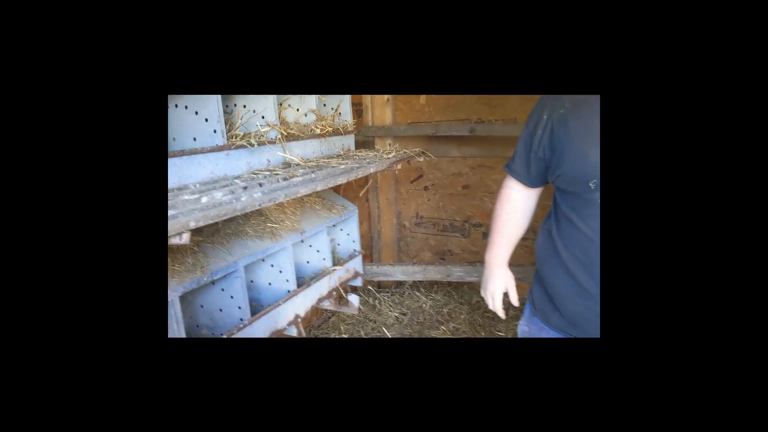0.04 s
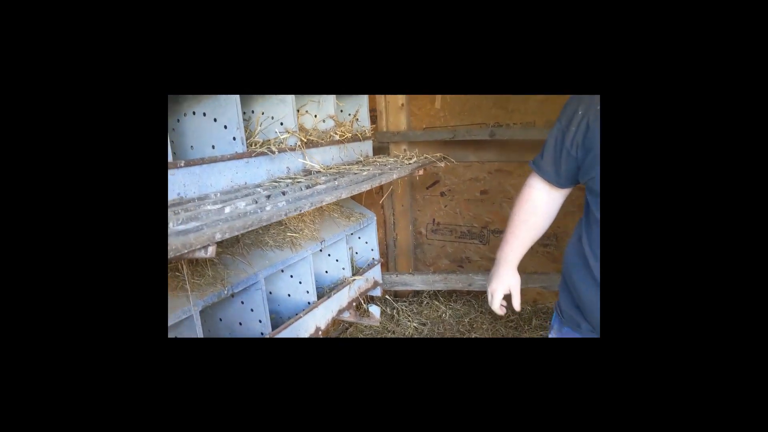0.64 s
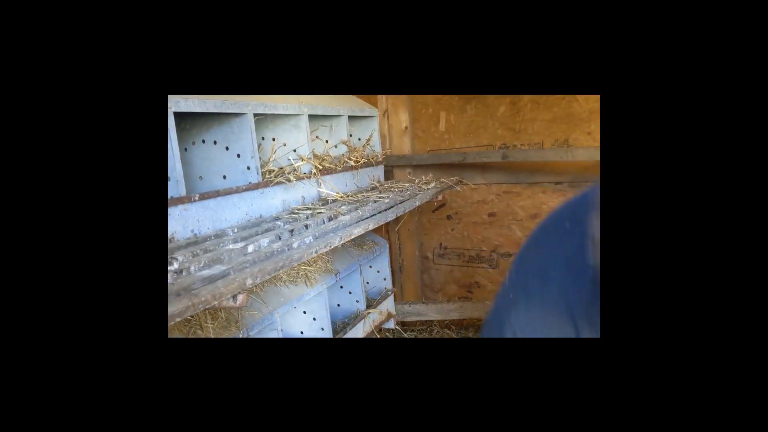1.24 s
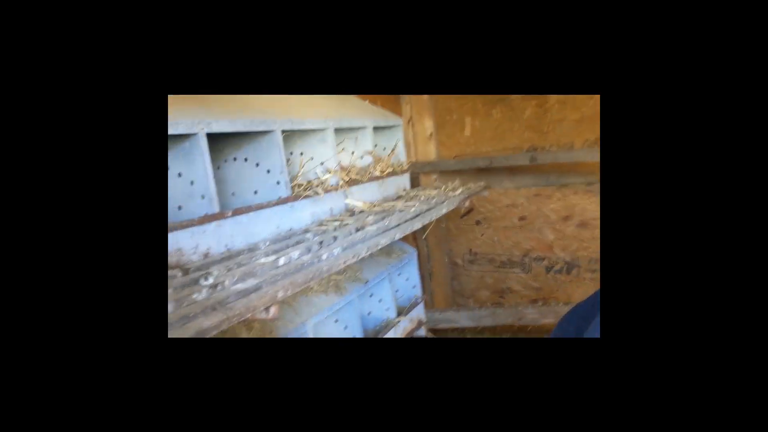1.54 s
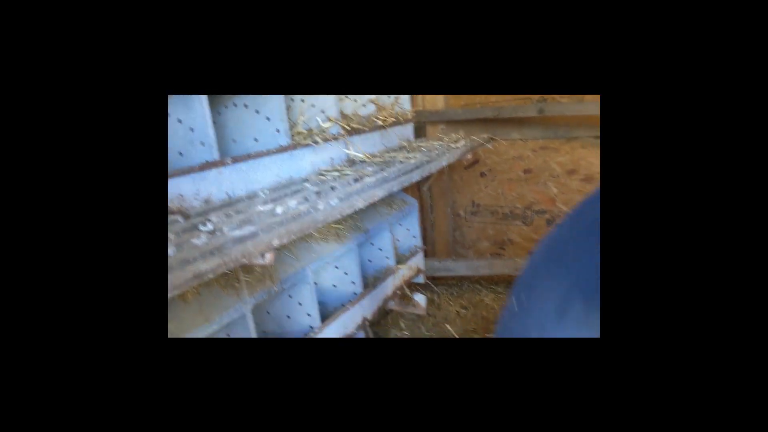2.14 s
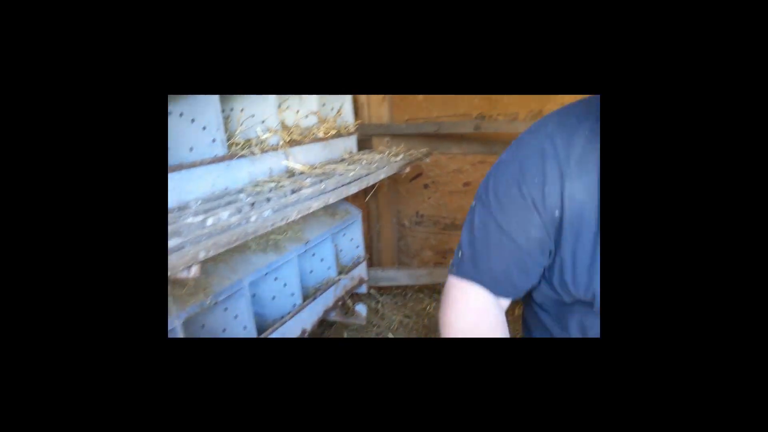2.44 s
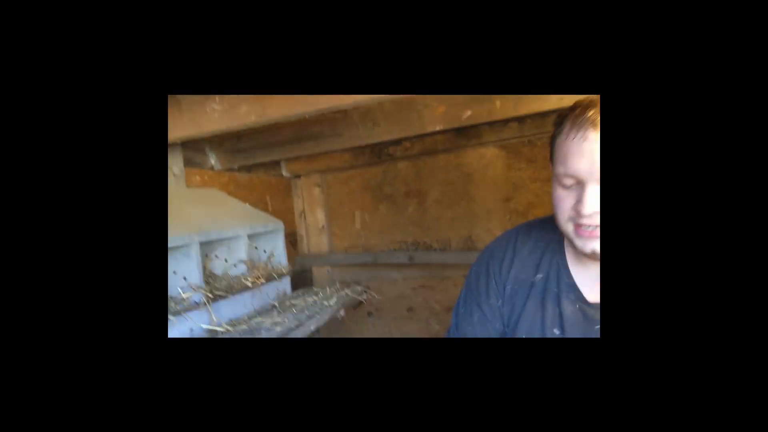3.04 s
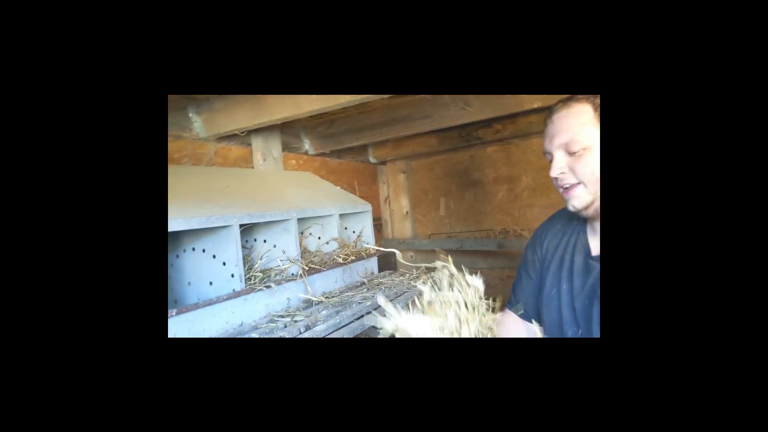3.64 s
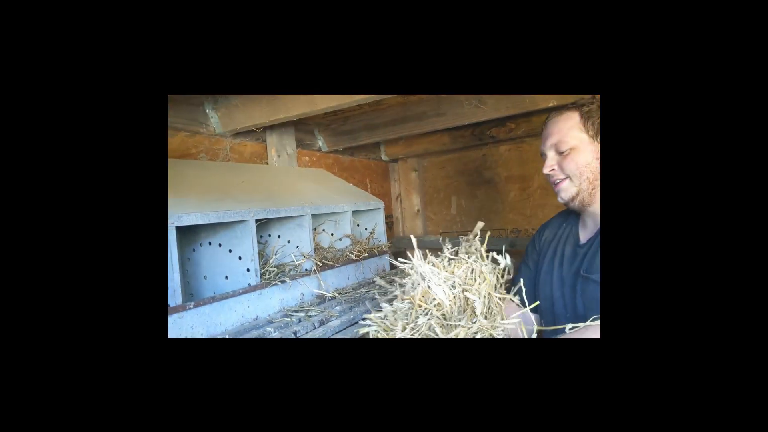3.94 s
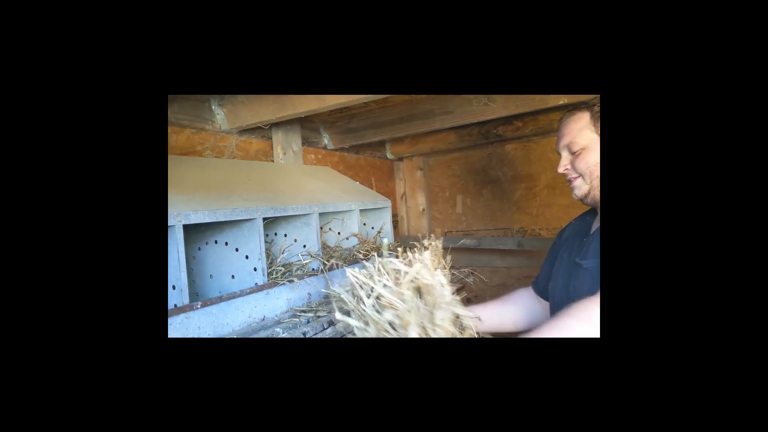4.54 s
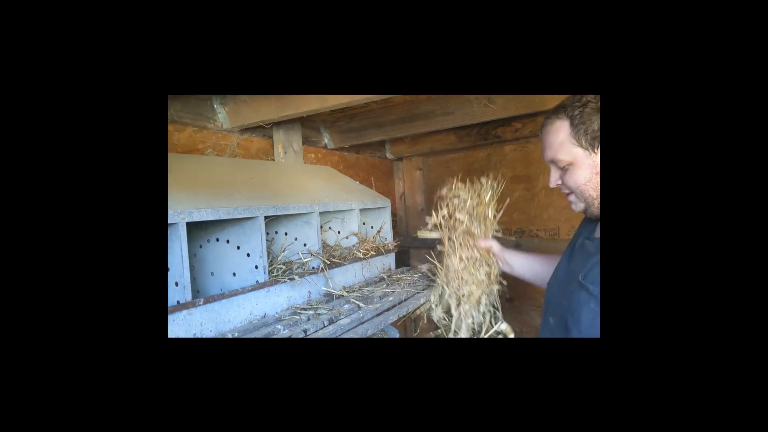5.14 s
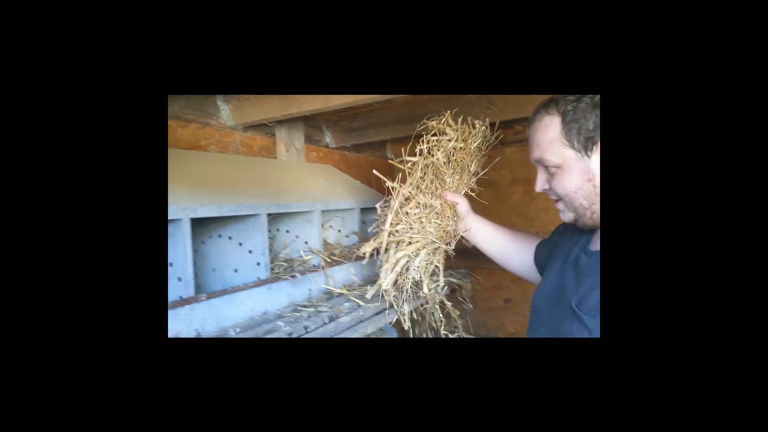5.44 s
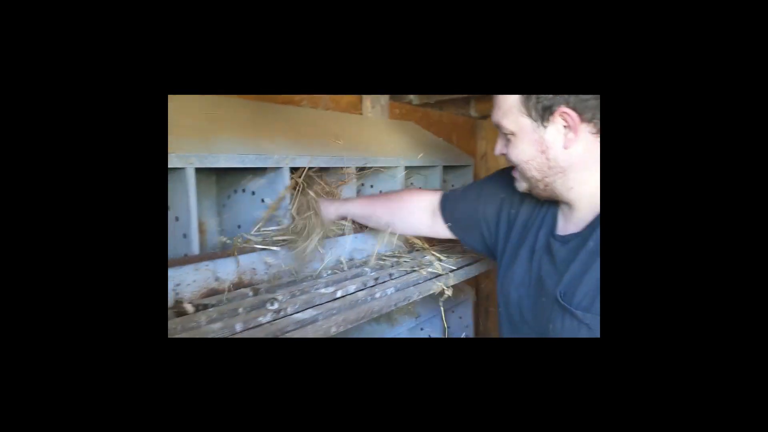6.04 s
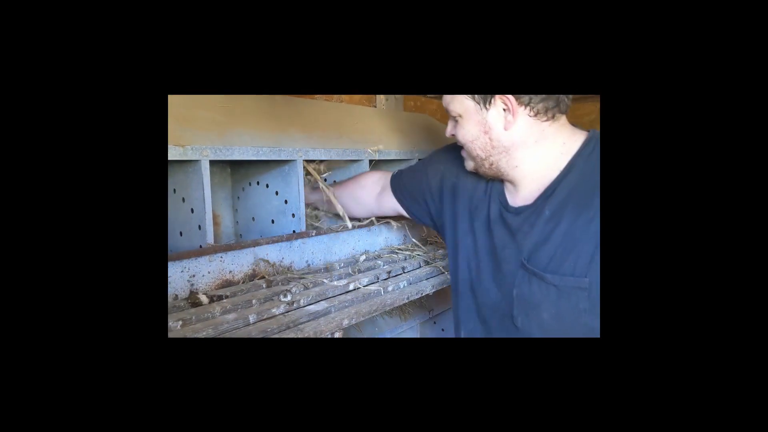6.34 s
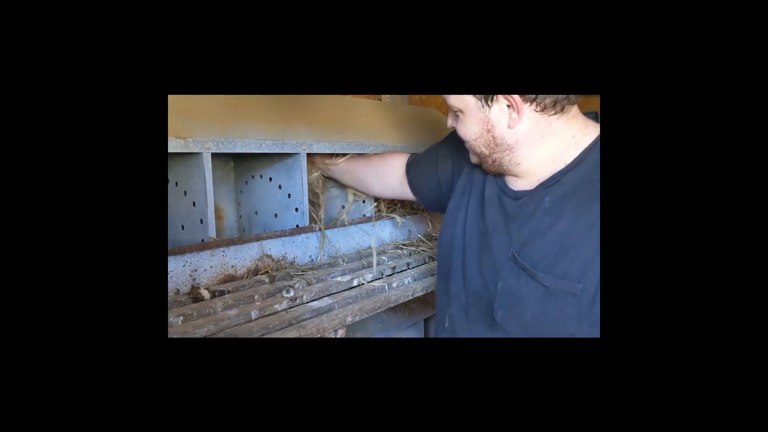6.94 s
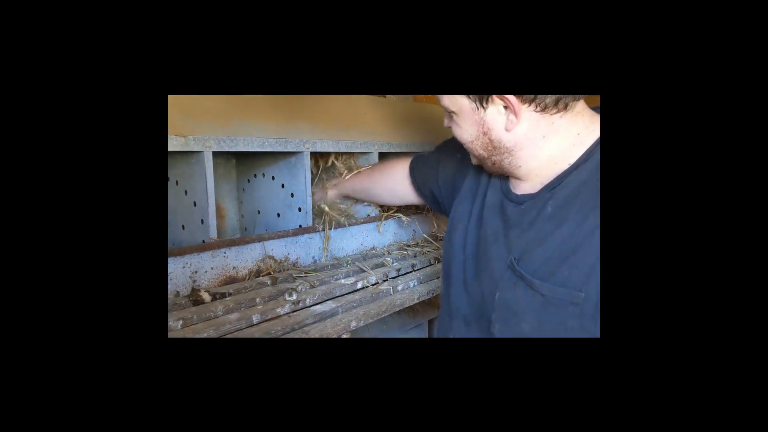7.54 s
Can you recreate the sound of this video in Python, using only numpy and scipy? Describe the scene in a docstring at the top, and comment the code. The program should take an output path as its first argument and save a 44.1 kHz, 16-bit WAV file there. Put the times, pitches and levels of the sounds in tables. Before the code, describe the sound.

For the first second and a half, dry hay rustles lightly close to the microphone in a small wooden chicken house, over quiet outdoor air. A few thin, squeaky calls, likely birds, come from farther off, with small knocks and a soft footfall at about 1.2 seconds. From 1.7 seconds the hay is pulled from a bale in crisp, crackling, swishing swells, with a brief rasp near 2.5. A bump and a board knock come at 3.4. The hay is shaken loose in repeated strokes, strongest around 4.6, followed by a few light wooden clacks just after 5 and a short easing. At about 6.1 seconds the bundle lands in a sheet-metal nest box with a soft thump and sharp stalk snaps, the loudest moment. Quick, uneven shoves follow until nearly 8 seconds, crackling and scraping against the faintly ringing metal walls.

```python
"""Inside a small wooden chicken house, close to the microphone, someone pulls dry hay from a bale,
shakes it loose and stuffs it into a sheet-metal nest box. Thousands of stalks snap and slide over each
other; in the box they scrape the walls and make them ring. Before that come a few thin squeaky calls
from farther off, likely of birds, and now and then a footfall or a knock, over quiet outdoor air."""
import sys
import numpy as np
from scipy import signal
from scipy.fft import rfft, irfft
from scipy.io import wavfile

SR = 44100
rng = np.random.default_rng(int(sys.argv[2]) if len(sys.argv) > 2 else 0)


def transcribe(u):
    """Save the signal u as a 16-bit wav file named by the first command-line argument.

    u: samples, shape (n,) or (channels, n), limited to [-1, 1]; the rate is SR.
    q: integer samples, one column per channel.
    """
    v = np.clip(np.atleast_2d(u).T, -1, 1)
    q = np.round(v * 32767).astype(np.int16)
    wavfile.write(sys.argv[1], SR, q)


N = 343980
TIME = np.arange(N) / SR
FREQS = np.maximum(np.arange(N // 2 + 1) * SR / N, 1)

# the hand in the hay, from light touches through the grab and the long pull to the shakes and the lift:
# peak_s, rise_s, fall_s, crackle_db, swish_over_crackle_db, extra_treble_db
HAND_STROKES = [(.135, 0.038, .03, -50.5, -18, -6), (.38, 0.058, 0.14, -56.5, -5.5, 5.5),
                (.52, 0.058, 0.16, -53.5, 2.5, 5), (.77, 0.17, 0.19, -57.5, 2.5, 6.5),
                (1.01, 0.073, 0.087, -54, 0, 6), (1.27, 0.15, 0.31, -61.5, 4, 3),
                (1.671, 0.014, 0.19, -37, -9, -0.5), (2.17, 0.36, 0.36, -42.5, -10.5, 0),
                (2.6, 0.35, 0.35, -39.5, -8, 2.5), (2.93, 0.039, 0.053, -38, -13, -4),
                (3.275, 0.3, 0.11, -34, -9.5, 4.5), (3.42, 0.092, 0.19, -36, -5.5, 3),
                (3.6, 0.19, 0.29, -40, -7, 0), (3.81, 0.23, 0.13, -38, -7.5, 5.5),
                (3.99, 0.093, 0.068, -36, -8, 3.5), (4.15, 0.15, 0.16, -36.5, -10, 3),
                (4.38, 0.12, 0.14, -37.5, -8.5, 3), (4.561, 0.1, 0.16, -30.5, -9, 3.5),
                (5.238, 0.53, 0.26, -38, -7.5, 3), (5.62, 0.2, 0.25, -45, -7, 2.5),
                (5.97, 0.14, 0.19, -39, -8, 4.5), (6.085, 0.047, 0.081, -30.5, -9.5, -1)]
# spectrum of hay up close: frequency_hz, relative_db
HAY_SPECTRUM = [(59, -46), (110, -12.5), (200, -15), (400, -12), (1400, -5), (2270, -1.93), (5400, -0.74),
                (7400, -7.5), (9500, -2), (11400, 2), (15000, -4), (16000, -14)]
# sparkle at the very top of the crackle: time_s, gain_db
SPARKLE_CURVE = [(1.5, -1), (2.7, 9), (3.25, 4), (3.7, -3), (7.8, -5)]
# single stalks breaking: start_s, level_db
STALK_SNAPS = [(3.2075, -27), (3.947, -31), (6.135, -19), (6.141, -17), (6.329, -24)]
# a tuft dragged free of the bale, then a brief hollow clack: peak_s, rise_s, fall_s, level_db
HOLLOW_RASPS = [(2.52, .07, .11, -43.5), (4.983, .015, .02, -42.5)]
# resonances of the hollow rasp and the clack: pitch_hz, width_hz, relative_db
HOLLOW_RESONANCES = [(530, 52, 0.5), (873, 100, -3), (1400, 87, -1), (2310, 220, -1), (2760, 200, -0.5)]
# shoves into the nest box: peak_s, half_length_s, extra_crackle_db, extra_scrape_db
BOX_SHOVES = [(6.136, 0.031, 9.5, 6.5), (6.212, 0.046, 1.5, 5), (6.306, 0.013, -1, 8.5),
              (6.342, 0.025, 6, 5.5), (6.448, 0.075, 4, 4.5), (6.543, 0.028, 5.5, 7.5),
              (6.683, 0.048, 2.5, 3.5), (6.761, 0.039, 3.5, 5.5), (6.848, 0.021, 3.5, 1),
              (6.928, 0.082, 4, 6), (7.074, .03, 4, 3.5), (7.107, 0.021, 1, 9.5), (7.175, 0.048, 5.5, 8),
              (7.331, 0.049, 4, 6.5), (7.4, 0.026, 5.5, 8.5), (7.515, 0.053, 4, 3),
              (7.614, 0.031, 6.5, 5.5), (7.73, 0.033, 1, 4)]
# spectrum of stalks scraping sheet metal: frequency_hz, relative_db
SCRAPE_SPECTRUM = [(59, -41), (100, -17), (166, -6), (429, -2), (466, -4.5), (786, -0.5), (5000, 5.5),
                   (6500, -40)]
# modes of the nest box walls: pitch_hz, relative_db, t60_s
WALL_MODES = [(168, -.5, .3), (296, 2, .25), (366, -.5, .22), (429, -1, .25), (790, 2, .1), (965, 3.5, .1),
              (1458, 2, .1), (1970, -3, .06), (2180, -2, .08), (2960, -2, .07)]
# spectrum of those walls flexing: frequency_hz, relative_db
FLEX_SPECTRUM = [(28, -6.5), (48, -20), (70, -10), (110, -22.5), (220, -55)]
# knocks on the boards: start_s, clatter_db, ring_db, brightness_hz, clatter_t60_s
BOARD_KNOCKS = [(.113, -54.5, -62, 900, .13), (.26, -38.5, -55, 1800, .018), (.489, -50, -56, 600, .2),
                (1.244, -47, -64, 2100, .14), (3.403, -36, -46, 1300, .07), (5.048, -35, -46, 3000, .1),
                (5.063, -43, -38, 3800, .14), (5.173, -37.5, -44, 3500, .22), (5.64, -48, -58, 1200, .25)]
# modes of the boards: pitch_hz, relative_db
BOARD_MODES = [(255, 0), (735, -2), (1460, -10), (2480, -2), (2820, 4)]
# soft footfalls, bumps and the bundle landing in the box: start_s, level_db, pitch_hz, t60_s
SOFT_THUMPS = [(1.187, -30, 285, .072), (1.189, -38, 400, .035), (1.2, -53, 276, .7), (3.40, -39, 191, .14),
               (3.434, -38, 265, .089), (3.834, -44, 70.9, .2), (6.09, -36, 434, .7)]
# calls farther off: start_s, length_s, start_hz, end_hz, tone_db,
# second_harmonic_over_tone_db, third_harmonic_over_tone_db, rasp_db
SQUEAKY_CALLS = [(.459, .054, 1500, 1475, -43.5, -6, -5.5, -47.5),
                 (.515, .1, 1170, 1120, -52, -12, -25, -56), (.688, .036, 1590, 1650, -46.5, -20, -35, -61),
                 (.7, .11, 1140, 1175, -51, -2, -12, -61), (.988, .065, 1480, 1534, -55, -4, -9, -47),
                 (1.56, .063, 1103, 1114, -57, -14, -25, -72)]
# resonances of the rasp in the calls: pitch_hz, width_hz, relative_db
CALL_RESONANCES = [(2570, 220, 0), (3070, 240, 0), (4350, 150, -2)]
# spectrum of the outdoor air: frequency_hz, relative_db
AIR_SPECTRUM = [(12, -36), (25, 4), (70, -8), (320, -11.5), (1300, -15), (3000, -17), (7500, -27),
                (11800, -23)]
# a faint hum that comes and goes: start_s, length_s, pitch_hz, level_db
LOW_HUMS = [(0.998, 0.45, 148, -60), (1.391, 0.044, 336, -52), (3.952, .23, 140, -58)]
# faint narrow whirs: pitch_hz, width_hz, relative_db
WHIR_RESONANCES = [(67, 14, 13.6), (1760, 110, 3.6), (4430, 89, 2)]
# balance of the two microphone ports: frequency_hz, left_over_right_db
PORT_BALANCE = [(750, 2), (1400, -3.5), (2300, -4.5), (3100, -1.5), (4200, 1.5), (6000, 9), (7500, 0),
                (9000, -3), (11500, -12.5), (15000, -14.5)]
# how alike the sound is at the two ports: frequency_hz, correlation
PORT_LIKENESS = [(130, .82), (300, .76), (640, .45), (1400, -.05), (3000, 0)]

SPLIT_HZ = 2510   # swish and scrape lie below, crackle above
TREBLE_HZ, SPARKLE_HZ = 8700, 11600   # the finest stalks crackle above the first, sparkle above the second
PRESS_S, PRESS_RISE_S = 6.097, 0.033   # the hand presses the bundle into the box


def hay(crush):
    """Thin stalks crackle, more of them the harder they are handled or crushed; the bulk swishes below."""
    handled, handled_treble, bulk = handling()
    force = np.hypot(handled, crush)
    treble_force = np.hypot(handled_treble, crush * from_db(2))
    typical_force = np.exp(np.log(force).mean())
    breaks_per_s = 2400 * (force / typical_force) ** 0.54
    spectrum = from_db(at_hz(HAY_SPECTRUM))
    low_share = 1 / (1 + (FREQS / SPLIT_HZ) ** 6)
    crackle = stalks(spectrum * np.sqrt(1 - low_share), breaks_per_s,
                     spread_db=1, grain_s=.00022, broad=.52, smooth=.54, flutter_db=.93)
    swish = stalks(spectrum * np.sqrt(low_share), per_s=1500,
                   spread_db=2.5, grain_s=.0011, broad=.38, smooth=.31, flutter_db=.5)
    fine = colour(crackle, 1 / (1 + (TREBLE_HZ / FREQS) ** 6))
    sparkle = colour(fine, FREQS > SPARKLE_HZ)
    sparkle_gain = from_db(np.interp(TIME, *np.transpose(SPARKLE_CURVE)))
    fine = fine - sparkle + sparkle * sparkle_gain
    crackle = (crackle - fine) * force + fine * treble_force
    return panned(crackle, pan_db=3.5) + panned(swish * bulk, pan_db=7)


def handling():
    """Gains of crackle, its treble and swish; overlapping strokes of the hand add in power."""
    power = np.zeros((3, N)) + from_db(-74.5) ** 2   # stalks settling between strokes
    for s, rise_s, fall_s, db, swish_db, treble_db in HAND_STROKES:
        peak_gains = from_db([db, db + treble_db, db + swish_db])
        power += np.outer(peak_gains, stroke(s, rise_s, fall_s)) ** 2
    return np.sqrt(power)


def stuffing():
    """Gains of crackle, scrape and pressure: the hand presses fast and eases off; shoves swell the first two."""
    onset = np.where(TIME < PRESS_S, stroke(PRESS_S, PRESS_RISE_S, PRESS_RISE_S), 1)
    held_s = np.maximum(TIME - PRESS_S, 0)
    steady_crush = onset * from_db(-34.5 - 2 * held_s)
    pressure = onset * from_db(-37.5 - 3 * held_s)
    crackle_db, scrape_db = sum(np.outer(extra_db, np.exp(-((TIME - s) / half_s) ** 2))
                                for s, half_s, *extra_db in BOX_SHOVES)
    return steady_crush * from_db(crackle_db), pressure * from_db(scrape_db), pressure


def stalks(spectrum, per_s, spread_db, grain_s, broad, smooth, flutter_db):
    """Stalks break and slide: `smooth` is the share of friction, `broad` of cracks across all octaves."""
    wide_cracks = fractures(per_s, spread_db, grain_s)
    octaves = np.log2(np.clip(FREQS, 400, 12800) / 400)
    frictions = rfft(stereo_noise()), rfft(stereo_noise())
    out = 0
    for k in range(6):
        octave_gain = np.sqrt(np.maximum(1 - abs(octaves - k), 0))
        band = irfft(frictions[k % 2] * spectrum * octave_gain, N)
        crack_power = broad * wide_cracks + (1 - broad) * fractures(per_s, spread_db, grain_s)
        out = out + band * np.sqrt(smooth + (1 - smooth) * crack_power)
    return rms_one(out * from_db(flutter_db * drift(rate_hz=18.4)))


def fractures(per_s, spread_db, grain_s):
    """Power of random tiny breaks, most weak and a few strong, each dying in a moment; mean 1."""
    sizes = from_db(spread_db * np.minimum(rng.exponential(1, N), 5)) ** 2
    breaks = rng.random(N) < per_s / SR
    decay = np.exp(-1 / (grain_s * SR))
    power = signal.lfilter([1], [1, -decay], sizes * breaks + 1e-12) / per_s
    return power / power.mean()


def snaps():
    """A thick stalk breaks with one bright tick."""
    ticks = sum(from_db(db) * blow(s, t60=.0069, rise_s=.0001) for s, db in STALK_SNAPS)
    return ticks * shaped_noise(HAY_SPECTRUM)


def hollow_rasps():
    """A hollow rasp that climbs in pitch and level as a tuft comes loose; the same resonances sound again in a
    brief clack."""
    friction, out = resonant_noise(HOLLOW_RESONANCES), 0
    for s, rise_s, fall_s, db in HOLLOW_RASPS:
        pitch_ratio = np.interp(TIME, [s - 2 * rise_s, s], [.75, 1])
        rasp = np.array([np.interp(np.cumsum(pitch_ratio), np.arange(N), side) for side in friction])
        out = out + from_db(db) * stroke(s, rise_s, fall_s) * rasp
    return panned(out, pan_db=-2)


def nest_box(push, pressure, body_hz=1010, hand_damping_db=2):
    """Stalk ends catch and slip on sheet metal; the walls ring, damped unevenly by the hand, and flex."""
    spectrum = from_db(at_hz(SCRAPE_SPECTRUM)) / np.sqrt(1 + (FREQS / SPLIT_HZ) ** 6)
    scrape = stalks(spectrum, per_s=1500, spread_db=2.8, grain_s=.0009, broad=.3, smooth=.5, flutter_db=.3)
    body = colour(scrape, 1 / (1 + (FREQS / body_hz) ** 4))
    # the body follows a shove only half as far, so each shove sounds brighter
    slips = body * np.sqrt(push * pressure) * from_db(2) + (scrape - body) * push
    walls = sum(from_db(db + hand_damping_db * drift(rate_hz=4.4)) * rms_one(ring(slips, hz, t60))
                for hz, db, t60 in WALL_MODES)
    ringing = rms_one(walls) * np.sqrt(np.mean(push ** 2))
    rumble = push * shaped_noise(FLEX_SPECTRUM)
    return slips + from_db(-13.5) * ringing + from_db(-17.5) * rumble


def knocks(lowest_hz=190, outlast_below_hz=990):
    """A knocked board clatters and rings, duller the softer the touch; low modes outlast the clatter."""
    noise, out = stereo_noise(), np.zeros((2, N))
    for s, clatter_db, ring_db, bright_hz, t60 in BOARD_KNOCKS:
        touch = signal.butter(2, [lowest_hz, bright_hz], "band", fs=SR, output="sos")
        click = np.arange(N) == int(s * SR)
        modes = 0
        for hz, db in BOARD_MODES:
            mode_t60 = t60 * np.sqrt(outlast_below_hz / hz)
            modes += from_db(ring_db + db + rng.normal()) * ring(click, hz, mode_t60)
        clatter = rms_one(signal.sosfilt(touch, noise)) * blow(s, t60, rise_s=.0018)
        out += from_db(clatter_db) * clatter + signal.sosfilt(touch, modes)
    return out


def thumps():
    """A footfall or soft bump sets one low mode ringing."""
    return sum(from_db(db) * np.sin(2 * np.pi * hz * (TIME - s)) * blow(s, t60, rise_s=.001)
               for s, db, hz, t60 in SOFT_THUMPS)


def squeaks():
    """Thin unsteady calls of three harmonics, each with some rasp around it."""
    out = np.zeros((2, N))
    waver = from_db(.095 * drift(rate_hz=300))   # about 1 % in pitch
    rasp = resonant_noise(CALL_RESONANCES)
    for s, length, start_hz, end_hz, tone_db, second_db, third_db, rasp_db in SQUEAKY_CALLS:
        span = slice(int(s * SR), int((s + length) * SR))
        pitch_hz = np.interp(TIME[span], [s, s + length], [start_hz, end_hz]) * waver[span]
        phase = 2 * np.pi * np.cumsum(pitch_hz) / SR
        tone = sum(from_db(db) * np.sin(k * phase + rng.uniform(0, np.pi / 2, (2, 1)))
                   for k, db in enumerate((0, second_db, third_db), 1))
        call = from_db(tone_db) * tone + from_db(rasp_db) * rasp[:, span]
        out[:, span] += swell(s, length)[span] * call
    return out


def coop(x, wet_db, t60=.17):
    """Close plank walls give a short dense tail that the hay soon soaks up."""
    age = TIME[:SR // 2]
    tail = rng.standard_normal((2, len(age))) * np.exp(-np.log(1000) * age / t60) * (age > .003)
    tail /= np.sqrt(np.sum(tail ** 2, axis=1, keepdims=True))
    return x + from_db(wet_db) * signal.fftconvolve(x, tail, axes=1)[:, :N]


def background():
    """Quiet outdoor air with faint whirs, a passing hum and a thin whine behind the calls."""
    air = from_db(-59.5) * shaped_noise(AIR_SPECTRUM)
    hum = sum(from_db(db) * swell(s, length) * np.sin(2 * np.pi * hz * TIME)
              for s, length, hz, db in LOW_HUMS)
    whine = from_db(-64) * swell(s=.41, length=1) * resonant_noise([(1750, 120, 0)])
    whirs = from_db(-64) * resonant_noise(WHIR_RESONANCES)
    return air + hum + whine + whirs


def stroke(s, rise_s, fall_s, roundness=1.59):
    """Gain of one hand movement, fastest at time s; roundness 1 is a pointed swell, 2 a bell."""
    away = np.maximum((s - TIME) / rise_s, (TIME - s) / fall_s)
    return np.exp(-np.minimum(away, 10) ** roundness)


def blow(s, t60, rise_s):
    """Envelope of a blow at time s."""
    age = np.maximum(TIME - s, 0)
    return (1 - np.exp(-age / rise_s)) * np.exp(-np.minimum(np.log(1000) * age / t60, 20))


def swell(s, length):
    """A rounded rise and fall."""
    return np.sqrt(abs(np.sin(np.pi * np.clip((TIME - s) / length, 0, 1))))


def ring(x, hz, t60):
    """One mode: a unit click sets a sine of height 1 ringing."""
    decay, angle = from_db(-60 / (t60 * SR)), 2 * np.pi * hz / SR
    return signal.lfilter([0, np.sin(angle)], [1, -2 * decay * np.cos(angle), decay ** 2], x + 1e-18)


def stereo_noise():
    """White noise, alike at both microphone ports in the bass and unrelated in the treble."""
    alike = at_hz(PORT_LIKENESS)
    mid, side = colour(rng.standard_normal((2, N)), np.sqrt([1 + alike, 1 - alike]))
    return np.array([mid + side, mid - side])


def shaped_noise(spectrum):
    """Noise with a spectrum of (frequency_hz, relative_db) points; rms 1."""
    return rms_one(colour(stereo_noise(), from_db(at_hz(spectrum))))


def resonant_noise(peaks):
    """Noise heard through resonances of (pitch_hz, width_hz, relative_db); rms 1."""
    power = sum(from_db(db) ** 2 / (1 + ((FREQS ** 2 - hz ** 2) / (FREQS * width)) ** 2)
                for hz, width, db in peaks)
    return rms_one(colour(stereo_noise(), np.sqrt(power)))


def drift(rate_hz):
    """Random wander with spread 1."""
    return rms_one(colour(rng.standard_normal(N), 1 / (1 + (FREQS / rate_hz) ** 2)))


def panned(x, pan_db):
    """Place a sound between the ports; positive is left."""
    return x * from_db(np.array([[.5], [-.5]]) * pan_db)


def colour(x, gain):
    """Filter by a gain per frequency."""
    return irfft(rfft(x) * gain, N)


def at_hz(points):
    """Read a curve on a log-frequency axis."""
    hz, value = np.transpose(points)
    return np.interp(np.log(FREQS), np.log(hz), value)


def rms_one(x):
    """Scale so that the centre of the stereo image has rms 1."""
    return x / np.sqrt(np.mean(np.atleast_2d(x).mean(axis=0) ** 2) + 1e-20)


def from_db(db):
    """Decibels to gain."""
    return 10 ** (np.asarray(db) / 20)


def scene():
    """The handling is close to the microphone, the calls farther off in the room, over the background."""
    crush, push, pressure = stuffing()
    near = hay(crush) + snaps() + hollow_rasps() + nest_box(push, pressure) + knocks() + thumps()
    return coop(near, wet_db=-13.5) + coop(squeaks(), wet_db=-8) + background()


def record(dry):
    """Each microphone port favours its own bands; the top is cut steeply at 15850 Hz."""
    left_over_right = from_db(at_hz(PORT_BALANCE)) ** 2
    port_gains = np.sqrt(2 * np.array([left_over_right, np.ones_like(FREQS)]) / (1 + left_over_right))
    top_cut = np.clip((15850 - FREQS) / 200 + .5, 0, 1)
    return colour(dry, port_gains * top_cut)


dry = scene()
out = record(dry)
transcribe(out)
```